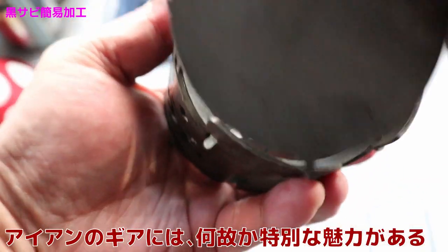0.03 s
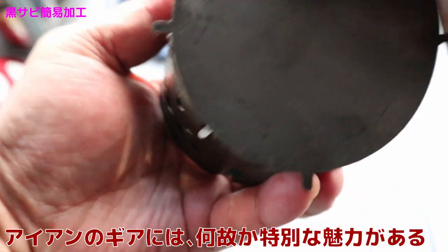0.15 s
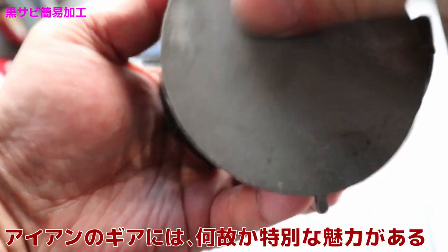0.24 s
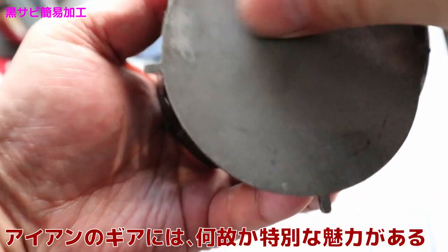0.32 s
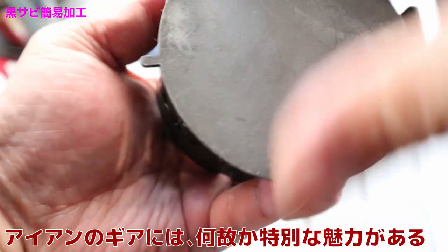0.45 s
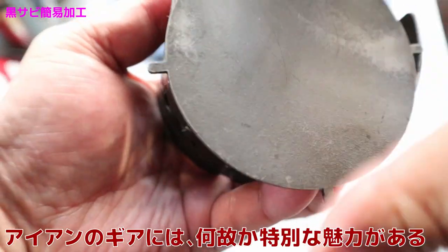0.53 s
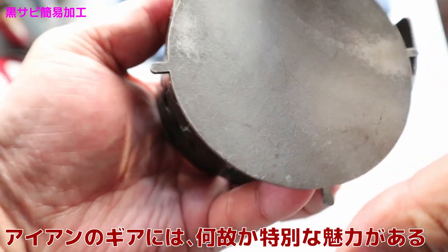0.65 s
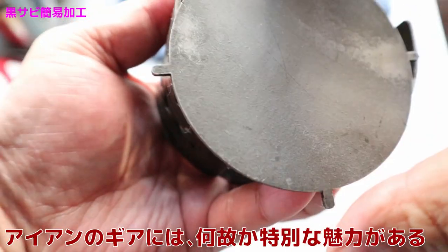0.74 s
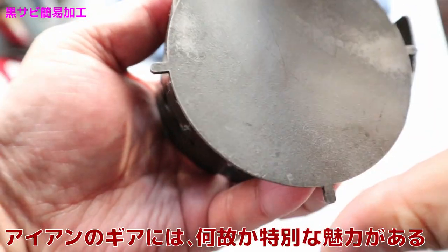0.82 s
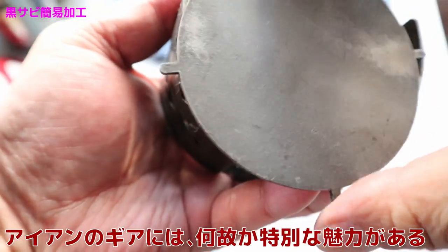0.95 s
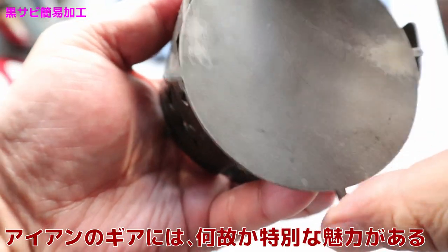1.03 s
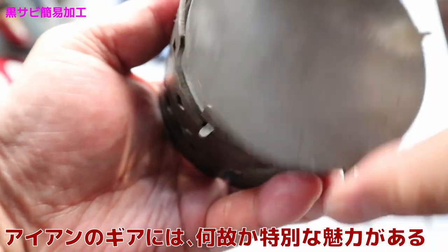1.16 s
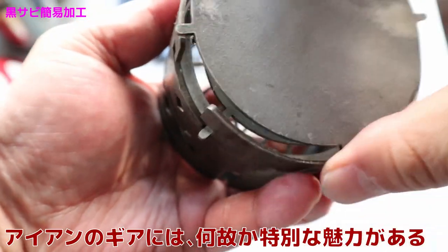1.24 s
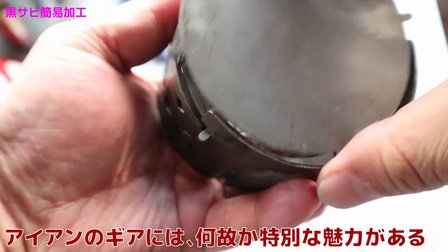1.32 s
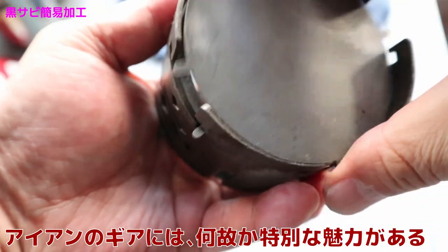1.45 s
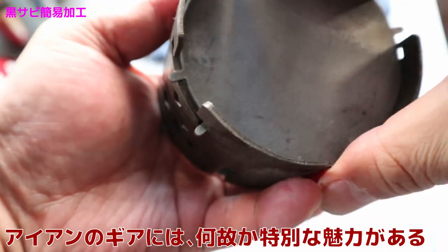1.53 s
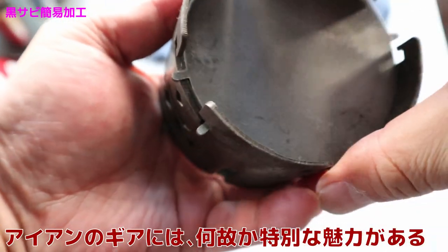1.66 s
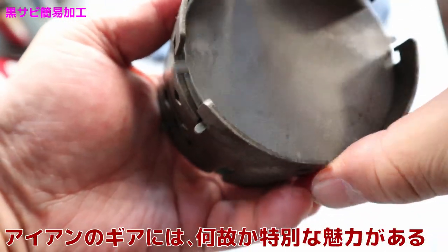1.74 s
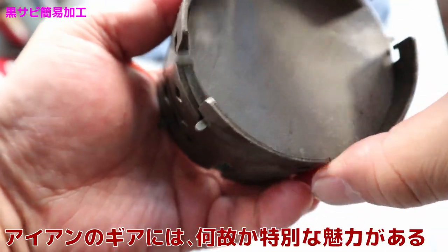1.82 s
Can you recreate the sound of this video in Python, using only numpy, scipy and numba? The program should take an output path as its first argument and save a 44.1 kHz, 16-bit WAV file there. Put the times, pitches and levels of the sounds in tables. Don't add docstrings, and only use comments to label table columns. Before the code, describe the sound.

A thin iron lid is flipped and fitted on a small hand-held iron cup. Loud clacks with short, finger-choked rings hit at 0.2 and 0.3 seconds, with a quick chatter. A lighter tap at 0.66 and a landing around 0.9 follow, then faint slides, soft knocks and a faint rim whine near 1.2-1.4. A sharp seating rattle comes at 1.48, small clicks at 1.68, tiny scrapes after. Close, quiet room, low hum.

```python
import sys
import numpy as np
from scipy import signal
from scipy.fft import rfft, irfft, next_fast_len
from scipy.io import wavfile
from scipy.ndimage import uniform_filter1d
from numba import njit

SR = 44100
rng = np.random.default_rng(int(sys.argv[2]) if len(sys.argv) > 2 else 0)


def boost(x):
    u = np.asarray(x, float) / 20
    return 10 ** u


def generate_wav(signal):
    frames = np.transpose(np.atleast_2d(signal))
    scaled = np.clip(frames, -1, 1) * 32767
    pcm = np.round(scaled).astype(np.int16)
    wavfile.write(sys.argv[1], SR, pcm)


N = 81585


def evened(x):
    return x / np.sqrt(np.mean(x ** 2) + 1e-20)


def read(points, hz):
    f, value = np.transpose(points)
    return np.interp(np.log(hz + 1), np.log(f + 1), value)


def tone_db(db, hz):
    hardness, thud = db[:, 3], db[:, 4]
    return hardness * max(np.log2(hz / 1197), 0) + thud * (hz < 1200)


@njit
def ring(x, turn, keep):
    out, z = np.zeros(len(x)), 0j
    for i in range(len(x)):
        z = z * turn[i] * keep[i] + x[i]
        out[i] = z.imag
    return out


# time in seconds, clack in dB, lid low ring in dB,
# lid high ring in dB, hardness in dB per octave.
CLINKS = [(0.0158, -38, -39, -53, 0), (0.1999, 4, 0, -16, -0.5), (0.2112, 3, -9.5, -24.5, -5.5),
          (0.2783, -17.5, -23.5, -50.5, -4.5), (0.2859, -22.5, -23, -46.5, -3.5),
          (0.3028, -7, -18.5, -29.5, -0.5), (0.3067, 5.5, -9, -7, 0), (0.3116, -0.5, -10.5, -6.5, 0.5),
          (.316, 0.5, -13, -19.5, 0), (.32, 0.5, -19, -24, -1), (.369, -25, -40.5, -28, -3),
          (0.6607, -7.5, -37, -36.5, -4), (0.8976, -5.5, -21, -37, -1.5), (0.9077, -4.5, -14, -28.5, 0.5),
          (0.9146, -19.5, -31.5, -26.5, 2.5), (1.1263, -9.5, -35, -50.5, -6), (1.1387, -16, -50, -31.5, -8),
          (1.3258, -19, -27, -37.5, -1.5), (1.4246, -13.5, -18.5, -35, -1.5),
          (1.4375, -11, -20.5, -40, -1.5), (1.4755, 0.5, -3, -15, 3), (1.485, 0.5, -20.5, -17, -2),
          (1.4897, -9, -11.5, -17.5, -1), (1.501, -12, -14.5, -18, -1.5), (1.509, -7, -25, -20, -2),
          (1.5735, -17.5, -32.5, -36, -5.5), (1.6692, -17, -32.5, -51, -6), (1.6747, -12, -30, -46.5, -4),
          (1.679, -13.5, -28, -45.5, -4.5), (1.688, -14, -30, -46.5, -3.5), (1.695, -12.5, -28, -39, -3)]
# time in seconds, clack in dB, thud in dB over the clack,
# hardness in dB per octave.
KNOCKS = [(.115, -51.5, -7, 0), (0.617, -46, 17, -13), (0.744, -40, 16.5, -2), (.808, -32.5, -18.5, -15.5),
          (.877, -39, 3, -13), (.902, -23.5, 4.5, -1.5), (1.028, -42, 17, -1), (1.04, -44, 4, -10),
          (1.091, -34, 10.5, -6), (1.095, -35.5, 16, -6), (1.367, -36.5, 15, 0.5), (1.369, -30, -8, -7),
          (1.416, -30, 7, -9), (1.763, -36, 8, -18), (1.765, -29, -11, -9.5), (1.772, -29, -6, -12),
          (1.793, -40, 4, -9), (1.8, -37, -5, -12), (1.846, -28, -4.5, -3), (1.848, -29.5, -10, -4.5)]
# start in seconds, length in seconds, clack in dB, lid low ring in dB,
# lid high ring in dB.
RATTLES = [
    (.302, 0.022, -17, -33, -31),
    (.322, 0.092, -48, -48, -46),
    (.663, 0.041, -59.5, -64, -56),
    (.9, 0.031, -33, -45, -38),
    (.925, 0.061, -59, -56, -49.5),
    (1.11, 0.063, -54, -72, -63),
    (1.48, 0.054, -35, -47, -46),
    (1.668, 0.044, -42.5, -46.5, -49),
]
# start in seconds, length in seconds, clack in dB, lid low ring in dB,
# lid high ring in dB.
SLIDES = [(.215, .06, -43, -46.5, -48), (.277, 0.032, -32, -36, -50), (.86, .035, -57.5, -70, -69),
          (1.029, .04, -51, -79, -80), (1.084, .035, -43, -70, -54), (1.375, 0.057, -42, -68, -53.5),
          (1.412, 0.025, -31.5, -34.5, -39), (1.432, 0.024, -28.5, -36, -52),
          (1.53, 0.088, -45, -45.5, -47), (1.761, 0.066, -51, -72.5, -66), (1.795, .025, -51, -60, -62)]
CLACK_DB, LOW_DB, HIGH_DB = -12.5, 5, 8.5
KNOCK_RING_DB = -17
GRAINS_PER_S, GRAIN_DB = 2400, 0.5
RATTLE_HARD_DB, SLIDE_HARD_DB = 3, -3


def contacts():
    c, k = np.array(CLINKS), np.array(KNOCKS)
    at = [c[:, 0], k[:, 0]]
    blow_db = c[:, 1:4] + [CLACK_DB, LOW_DB, HIGH_DB]
    knock_ring_db = k[:, 1] + KNOCK_RING_DB
    db = [np.c_[blow_db, c[:, 4], 0 * c[:, 4]],
          np.c_[k[:, 1], knock_ring_db, knock_ring_db, k[:, 3], k[:, 2]]]
    for runs, hard_db in (RATTLES, RATTLE_HARD_DB), (SLIDES, SLIDE_HARD_DB):
        for start, length, *level_db in runs:
            gaps, size = rng.exponential(1, (2, 240))
            u = np.minimum(np.cumsum(gaps) / GRAINS_PER_S / length, 1)
            swell = np.sin(np.pi * u ** 0.61) + 0.018
            shape_db = np.where(u < 1, 20 * np.log10(swell), -200)
            grain_db = shape_db + GRAIN_DB * (np.minimum(size, 3) - 1)
            at.append(start + u * length)
            db.append(np.c_[grain_db[:, None] + level_db, hard_db + 0 * u, 0 * u])
    index = np.round(np.concatenate(at) * SR).astype(int).clip(0, N - 1)
    return index, np.concatenate(db)


# frequency in Hz, level in dB, t60 in seconds.
LID = [(2382, -2, 0.21), (2402, -10.5, 0.48), (5445, -1.5, 0.29), (5950, -20, .3), (2010, -9.5, 0.097),
       (7500, -28, 0.23), (5130, -20, 0.094), (8794, -16.5, .25), (9300, -24, 0.37), (10270, -23.5, 0.15),
       (11880, -27, 0.18), (13300, -24.5, .12), (12660, -26.5, .12), (8970, -19.5, .12)]
# time in seconds, damping of the low ring and of the high ring in dB over the free ring.
GRIP = [(0, -1, -3), (0.169, 4, 2), (.2, 10, 7.5), (.225, 10.5, 9.5), (.24, -1, 8), (.3, 4.5, 6),
        (0.32, 16, 17.5), (0.399, 8, 7), (.9, 17, 10.5), (1.1, 8, -2), (1.151, 4, -2), (1.32, -3, 0),
        (1.42, 14.5, 9), (1.47, 6, 4), (1.56, 10.5, 3.5), (1.63, 9, 10.5), (1.7, 6.5, 13), (1.72, 12, 14)]
# time in seconds, rise in percent.
PRESS = [(.18, 0), (.2, -.4), (.3, -.3), (.31, .8), (.4, .2), (.65, 2.4), (1.0, 2.8), (1.1, 0), (1.685, 0),
         (1.7, 3), (1.72, 11), (1.735, 2), (1.76, 0)]
# time in seconds, level in dB.
SING = [(1.16, -66), (1.24, -50), (1.35, -49), (1.385, -39), (1.41, -44), (1.43, -66)]
SING_HZ = 3318
MUTE_DB, MUTE_HIGH_DB = -14, -8.5
LID_SPREAD_DB = 2.5
FREED_S = 1.1


def lid(at, db):
    t, blows = np.arange(N) / SR, len(CLINKS)
    s, *grip_db = np.transpose(GRIP)
    grip = [boost(np.interp(t, s, g)) for g in grip_db]
    low_bend = 1 + np.interp(t, *np.transpose(PRESS)) / 100
    high_bend = np.where(t < FREED_S, low_bend, 1)
    choke, out = np.ones((2, N)), np.zeros(N)
    choke[:, at[:blows]] = boost([[MUTE_DB], [MUTE_HIGH_DB]])
    for k, (hz, mode_db, t60) in enumerate(LID):
        high = int(k > 1)
        spot = rng.standard_normal((len(at), 2))
        spot[:blows] = spot[:blows] * [k > 2, 0] + [0, 1]
        level_db = db[:, 2] + tone_db(db, hz / 2) if high else db[:, 1]
        level = boost(level_db + mode_db + LID_SPREAD_DB * spot[:, 0])
        push = np.bincount(at, level * np.sign(spot[:, 1]), N)
        bend = high_bend if high else low_bend
        turn = np.exp(2j * np.pi * hz * bend / SR)
        out += ring(push, turn, choke[high] * boost(-60 * grip[high] / t60 / SR))
    sing = boost(np.interp(t, *np.transpose(SING), -120, -120)) * np.sin(2 * np.pi * SING_HZ * t)
    return out + sing


# frequency in Hz, level in dB, t60 in seconds.
CUP = [(402, -15, 0.02), (882, -6, 0.011), (1493, -11, .04), (1652, -2, 0.023), (1860, -2, 0.018),
       (2027, -9, 0.022), (2180, -0.5, 0.01513), (2465, -4.5, 0.029), (2776, -16, .035), (3065, -15, 0.055),
       (4070, -6, 0.011), (5770, -19.5, 0.0386), (3416, -8.5, 0.014), (9970, -15.5, 0.015)]
SPREAD_DB = 5


def cup(at, db):
    out = np.zeros(N)
    for hz, mode_db, t60 in CUP:
        spot = rng.standard_normal((len(at), 2))
        level = boost(db[:, 0] + tone_db(db, hz) + mode_db + SPREAD_DB * spot[:, 0])
        push = np.bincount(at, level * np.sign(spot[:, 1]), N)
        turn = np.full(N, np.exp(2j * np.pi * hz / SR))
        out += ring(push, turn, np.full(N, boost(-60 / t60 / SR)))
    return out


# frequency in Hz, level in dB.
TICK = [(100, -24.5), (1210, -17.5), (1520, -10), (2420, -2.5), (5070, -8.5), (5510, -9.5), (6670, -8),
        (11000, -19), (15500, -35)]
TICK_DB, TICK_T60 = -6.5, 0.013


def ticks(at, db):
    t, out = np.arange(1024) / SR, np.zeros(N)
    for lo_hz, hi_hz in (60, 1400), (1200, 5500), (3500, 11000), (7000, 20000):
        level = boost(db[:, 0] + tone_db(db, np.sqrt(lo_hz * hi_hz)))
        band = np.zeros(N)
        for k in range(4):
            crack = rng.standard_normal(1024) * boost(-60 * t / TICK_T60)
            band += signal.oaconvolve(np.bincount(at[k::4], level[k::4], N), crack)[:N]
        out += signal.sosfilt(signal.butter(2, [lo_hz, hi_hz], "band", fs=SR, output="sos"), band)
    log_gain = np.log(boost(read(TICK, abs(np.fft.fftfreq(4096, 1 / SR)))))
    colour = np.fft.ifft(np.exp(np.conj(signal.hilbert(log_gain)))).real[:2048]
    return boost(TICK_DB) * signal.oaconvolve(out, colour / np.linalg.norm(colour))[:N]


# frequency in Hz, t60 in seconds.
ROOM = [(250, 0.35), (1000, 0.23), (3000, .2), (10000, 0.18), (14000, 0.066)]
ROOM_DB = -11.5


def room(x):
    taps = np.zeros((2, SR // 2))
    at = np.arange(120, SR // 2 - 20, 20)
    spots = at + rng.integers(0, 20, (2, len(at)))
    np.put_along_axis(taps, spots, rng.choice([-1., 1.], (2, len(at))), 1)
    hz, t, z = signal.stft(taps, SR, nperseg=256)
    tail = signal.istft(z * boost(-60 * t / read(ROOM, hz)[:, None]), SR, nperseg=256)[1]
    return signal.fftconvolve(x[None], tail / np.linalg.norm(tail[0]), axes=1)[:, :N]


# frequency in Hz, level in dB per Hz.
HUM = [(12, -33.5), (20, -1), (315, -9.5), (1460, -22.5), (2680, -20.5), (2920, -26.5), (7520, -38.5),
       (10200, -50), (13000, -71.5), (15500, -90.5)]
# frequency in Hz, likeness from -1 to 1.
HUM_SAME = [(60, 1), (380, 0.58), (2380, -0.29), (15000, 0.96)]
HUM_DB = -47


def hum():
    frames, hz = N // 256 + 5, np.fft.rfftfreq(1024, 1 / SR)
    a, b, c, d, patches = rng.standard_normal((frames, 513, 5)).T
    patches = evened(uniform_filter1d(uniform_filter1d(patches, 12, 0), 14, 1))
    same = np.clip(read(HUM_SAME, hz), -1, 1)[:, None]
    left, other = a + 1j * b, c + 1j * d
    z = np.array([left, same * left + np.sqrt(1 - same ** 2) * other])
    z *= boost(read(HUM, hz)[:, None] + 1.2 * patches)
    return boost(HUM_DB) * evened(signal.istft(z, nperseg=1024, noverlap=768)[1][:, :N])


# frequency in Hz, left over right in dB.
LEAN = [(60, 3.5), (130, -3), (290, 1.5), (640, -2), (1410, -7), (3100, -8), (6820, -2), (15000, -5)]
# frequency in Hz, lead in radians.
LEAD = [(0, -0.88), (1120, 0.9), (2500, 0.39), (3790, 2.2), (5430, -1.1), (5770, -0.56), (14600, -1.5),
        (15200, -0.5)]


def scene():
    at, db = contacts()
    iron = lid(at, db) + cup(at, db) + ticks(at, db)
    iron = signal.sosfilt(signal.butter(3, 120, "high", fs=SR, output="sos"), iron)
    size = next_fast_len(N + 4096)
    hz = np.fft.rfftfreq(size, 1 / SR)
    port = boost(read(LEAN, hz) / 2) * np.exp(.5j * read(LEAD, hz))
    near = irfft(rfft(iron, size) * np.array([port, 1 / port]), size)[:, :N]
    tail = boost(ROOM_DB) * room(iron) * boost(np.array([[-2.5], [2.5]]))
    return near + tail + hum()


def low_pass(x):
    return signal.sosfilt(signal.butter(12, 15660, fs=SR, output="sos"), x)


def record(dry):
    drive_db = -5
    return low_pass(np.clip(dry * boost(drive_db), -1, 1))


dry = scene()
out = record(dry)
generate_wav(out)
```